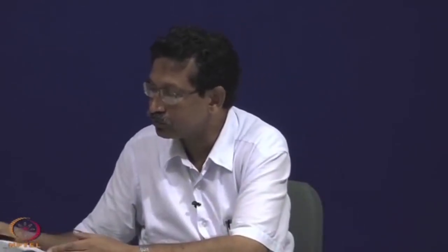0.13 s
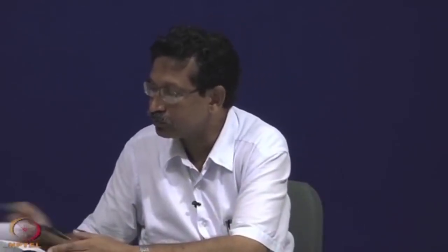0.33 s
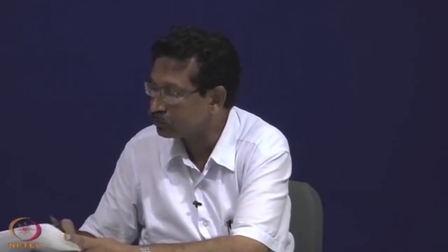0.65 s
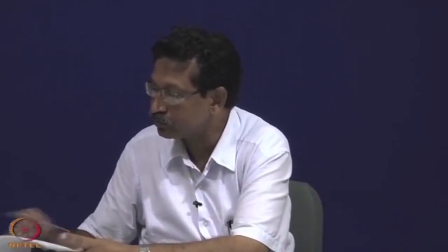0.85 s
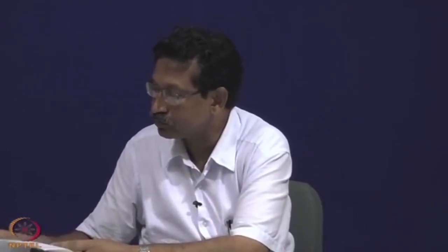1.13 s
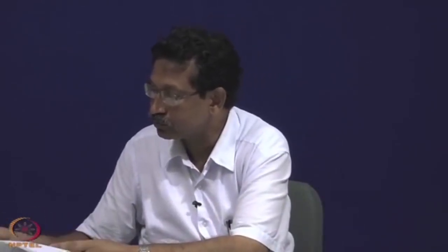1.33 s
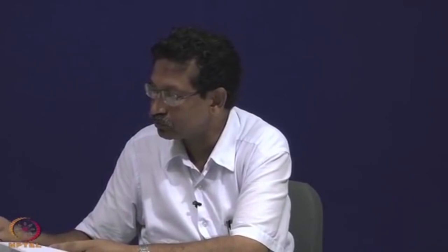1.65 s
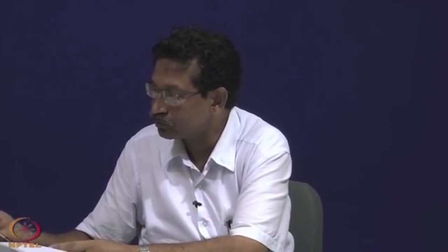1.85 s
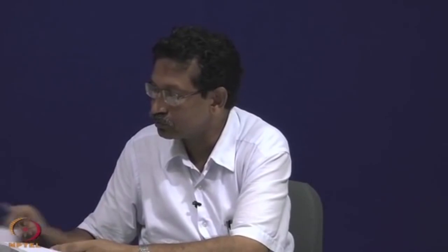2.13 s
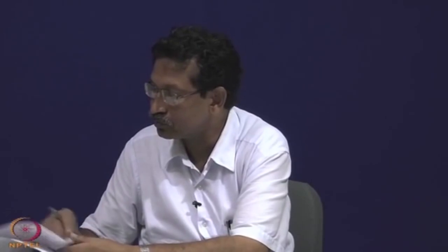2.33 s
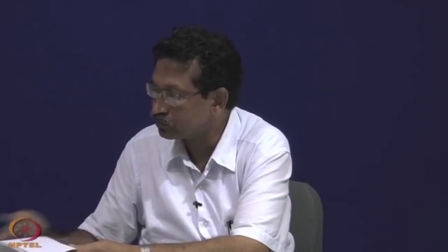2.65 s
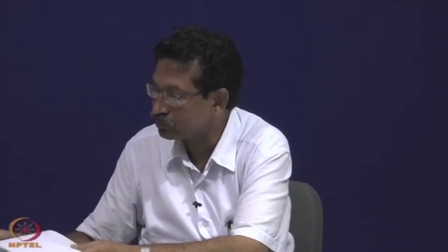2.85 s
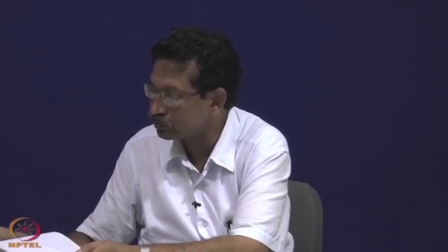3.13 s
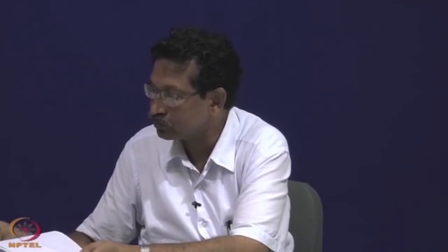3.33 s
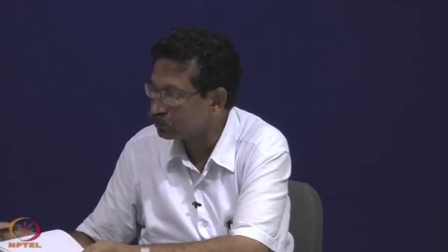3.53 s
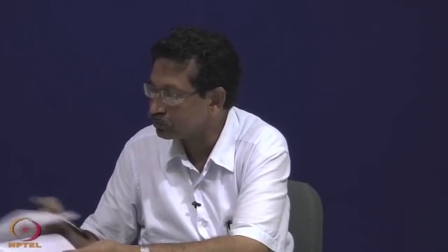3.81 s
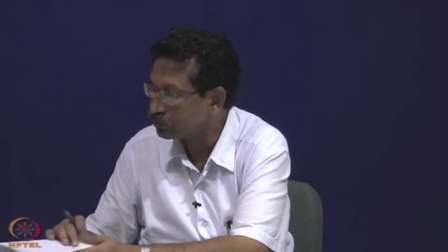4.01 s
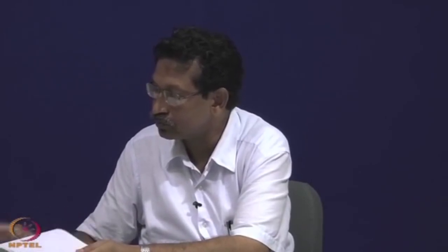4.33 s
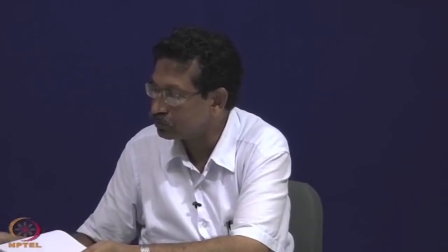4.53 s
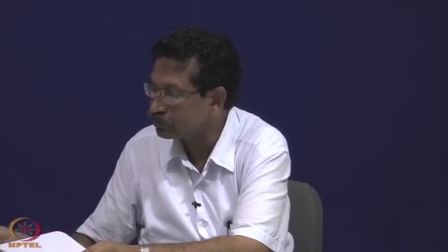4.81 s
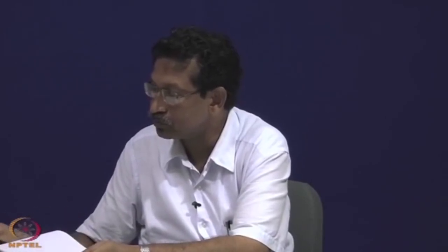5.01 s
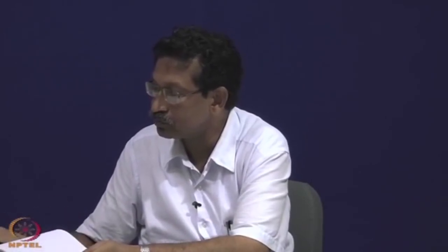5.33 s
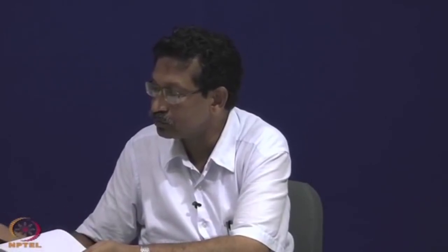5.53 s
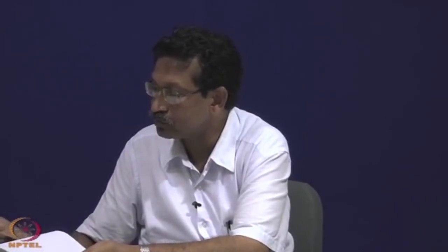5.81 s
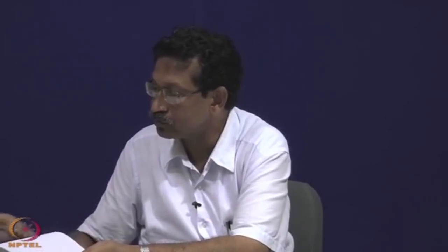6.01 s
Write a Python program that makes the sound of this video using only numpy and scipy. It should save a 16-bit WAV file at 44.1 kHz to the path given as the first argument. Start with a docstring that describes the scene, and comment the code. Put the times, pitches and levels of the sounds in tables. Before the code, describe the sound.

A low ventilation rumble with a faint hum and hiss fills a quiet room throughout. Close to a clip-on microphone, paper shifts in small, soft strokes. At about 0.6 seconds a sheet slaps down with a sharp crack, the loudest moment, followed by crinkles and a light knock at 1 second. A quick cluster of dull knocks on the desk and a pad comes at 2 seconds. From 2.2 to 3 seconds sheets slide and crackle in short strokes, with small taps and a pen click near 2.6. Faint arm rubs and slides lead to a crisp paper snap and light knocks at 4 seconds. The handling then thins to very soft sliding from 5 seconds. A pen taps the desk near 5.9 seconds and the pad is bumped just after 6. The knocks and snaps carry a slight, short room echo.

```python
"""Paper on a desk

Sheets are slid, lifted and laid down in a quiet room, heard by a clip-on microphone. They hiss as they
rub, snap as they buckle (suddenly bend), and one slaps down. A hand with a pen taps the desk, a pad is
bumped and an arm shifts. Ventilation rumbles and hums behind it all."""
import sys
import numpy as np
from scipy import signal
from scipy.fft import rfft, irfft, next_fast_len
from scipy.io import wavfile
from scipy.ndimage import uniform_filter1d

SR = 44100
rng = np.random.default_rng(int(sys.argv[2]) if len(sys.argv) > 2 else 0)


def unload_wav(signal):
    """Save mono or channel-first audio to the path in sys.argv[1] as 16-bit WAV at rate SR, clipped to [-1, 1]."""
    wavfile.write(
        sys.argv[1],
        SR,
        np.round(np.clip(np.atleast_2d(signal).T, -1, 1) * 32767).astype(np.int16),
    )


N = 272097

TREBLE_LIMIT_HZ = 15950
# how long the room echoes at each pitch: f/Hz, time to fade by 60 dB/s
ECHO_TIMES = [(150, 0.58), (1000, 0.49), (4000, 0.46), (14000, 0.37)]
# how loud the air duct rumbles over time: t/s, level/dB
RUMBLE_LEVELS = [(0.0, -42.5), (0.27, -52), (0.45, -43), (0.74, -58.5), (0.98, -49.5), (1.63, -47.5),
                 (1.7, -60), (1.97, -43.5), (2.34, -57), (3.16, -42.5), (3.25, -53), (3.81, -45.5),
                 (4.04, -58), (4.31, -42.5), (5.46, -54), (6.17, -48)]
# tones of the fan: f/Hz, level/dB, pitch wander/Hz
FAN_TONES = [(347.3, -74, 1.2), (465, -85, 3), (587, -87, 3.02), (793, -85.5, 3.18)]

# A spectrum says how strong a sound is at each pitch: f/Hz, relative level/dB
RUMBLE_SPECTRUM = [(12, -19), (20, 0), (28, 2), (39, -0.5), (48, -20), (70, -33.5), (85, -30.5), (115, -40),
                   (170, -88)]  # the duct's deep rumble
DRONE_SPECTRUM = [(35, -36.5), (50, -12.5), (58.5, 1.5), (68, -16), (85, -17), (150, -60), (400, -80)]  # the duct's own low note
ROOM_HISS_SPECTRUM = [(60, -19.5), (100, 1.5), (140, 1.5), (220, -0.5), (330, -1.5), (480, -3.5),
                      (750, -4.5), (1100, -10.5), (1700, -13.5), (2600, -21), (4000, -28), (8000, -31.5),
                      (11500, -32), (13500, -47)]  # steady background hiss of the room, with the very top cut away
HISS_SPECTRUM = [(2500, -17), (3500, -4.5), (4600, -2), (6200, 0), (7200, -2), (10500, -4), (12000, -9.5),
                 (15500, -8)]  # the high part of sliding paper
RUSTLE_SPECTRUM = [(150, -10.5), (400, 0), (950, -7.5), (1500, -2.5), (2400, -4.5), (3200, -14),
                   (5000, -44), (12000, -57)]  # its lower part
CRACK_SPECTRUM = [(300, -43), (1000, -17), (1800, -5.5), (2650, 1.5), (3300, -7.5), (4900, 1.5),
                  (5900, -0.5), (7200, -16.5), (9000, -9.5), (11200, -9), (13000, -7), (15000, -10.5)]  # a sheet slapping down
FLUTTER_SPECTRUM = [(120, -14), (280, -3), (800, 0.5), (1300, 4.5), (1800, -2), (2600, -4.5), (3500, -18.5),
                    (5400, -12), (7200, -15.5), (9000, -13.5), (10500, -14), (15500, -22)]  # a sheet fluttering afterwards

# Modes are the tones a thing rings with when struck: f/Hz, relative level/dB, ring time/s
DESK_MODES = [(277, -18.5, 0.022), (453, -12.5, 0.024), (639, -3.5, 0.014), (850, 4.5, 0.005),
              (1253, 7, 0.0042), (1650, 3.5, 0.0038), (2450, -9, 0.0097), (4100, -54, 0.0022),
              (8000, -23, .001)]  # the desk top under the paper
PEN_MODES = [(2170, -1, 0.0066), (3000, -2.5, 0.0068), (4780, 2.5, 0.0047), (6030, -6.5, 0.0079),
             (8040, -3.5, .005), (9370, 3, 0.0036), (10470, -6, .004)]  # the pen barrel
PAD_MODES = [(750, -3.5, 0.0047), (1226, 1.5, 0.0051), (2140, -4, 0.0078), (2360, -10, 0.0093),
             (4280, -18, 0.0046)]  # the pad of sheets
BUCKLE_MODES = [(1325, -2, 0.013), (2083, -0.5, 0.0093), (2400, -8, 0.004), (4300, 1.5, 0.0036),
                (5980, -2, 0.0046), (8400, 2, 0.0025), (11900, -32, 0.0019)]  # a buckling sheet
CREASE_MODES = [(1320, -5, 0.0075), (1610, -3, 0.006), (2050, 0.5, 0.0086), (2390, -6, 0.0057)]  # a gripped sheet
SHUDDER_MODES = [(500, -7, 0.043), (1080, -11, 0.033), (1310, -3, 0.033), (1410, -14, 0.06),
                 (1797, 0.5, 0.028), (2124, -4, 0.021), (2510, -1.5, 0.026), (3000, -9, 0.029),
                 (4520, -11, 0.025), (5200, -9, 0.018), (5560, -3, .014)]  # a whole sheet shaking on the desk

# an arm shifts on the desk: t/s, length/s, level/dB, middle f/Hz
ARM_SHIFTS = [(0.831, 0.093, -70, 332), (1.269, 0.11, -70, 296), (2.575, 0.048, -69, 513),
              (3.212, 0.16, -61.5, 182), (3.3, 0.22, -71, 171), (3.94, 0.11, -70, 230),
              (5, 0.084, -66, 290), (5.064, 0.05, -73, 493), (5.539, 0.58, -82.5, 3100),
              (6.005, 0.046, -67, 268)]
# Harder blows have a higher corner and sound brighter; stiffness multiplies the pitch of the modes.
# Knocks: t/s, peak level/dB, corner f/Hz, stiffness
DESK_TAPS = [(0.56, -36.5, 326, 0.76), (1.035, -44.5, 1990, 1.07), (1.9839, -38, 1600, 0.87),
             (1.9962, -35, 1900, 1.05), (1.9982, -44, 1600, 0.91), (2.1297, -44, 600, 1.16),
             (2.161, -49.5, 550, 1), (2.549, -46.5, 1500, 1.13), (2.58, -48, 1100, .9),
             (2.5525, -45.5, 700, 0.98), (2.5938, -47, 700, 0.89), (4.003, -44, 450, 0.9),
             (4.124, -44.5, 1100, 1.14), (5.8869, -39, 1000, .94)]  # hand and pen meet the desk
PEN_CLICKS = [(2.5773, -40, 16000, 1.01), (3.3897, -51, 7000, 0.9), (5.8882, -46, 2440, 0.84),
              (5.999, -56, 9000, 1.3)]  # the pen clicks down on the paper
PAD_BUMPS = [(1.0351, -50.5, 4000, 0.89), (3.961, -45, 1800, 1.16), (2.0043, -38.5, 1500, 1.02),
             (6.148, -32, 4940, 0.983)]  # the pad is bumped
# a sheet is gripped: t/s, length/s, level/dB, fade over the length/dB, stiffness
GRIPS = [(2.264, 0.041, -61.5, 7, 1.03), (2.316, 0.018, -64, 2, 1.05), (2.739, 0.17, -72.5, 0, 0.94),
         (4.119, 0.02, -59.5, 4, 0.94)]
# a sheet buckles: t/s, peak level/dB, corner f/Hz, stiffness, flutter compared with the ring/dB
BUCKLES = [(0.0358, -55.5, 4500, 0.99, 2.5), (0.108, -57.5, 2000, 0.67, 5), (0.177, -56, 2200, 0.78, 6),
           (0.2502, -50.5, 3250, 1.33, -1.5), (0.392, -56, 1500, 0.39, -20),
           (0.4417, -52.5, 3200, 0.91, 7.5), (0.508, -56, 2600, 1.3, 8), (0.5498, -46, 900, 1.1, -4),
           (0.569, -48, 7000, 1.25, -2), (0.5833, -48, 14000, 1.3, 3), (0.59, -45.5, 3000, 1, -10),
           (.596, -49, 14000, 1.5, -12.5), (0.602, -49, 14000, 1.2, -9), (0.611, -47, 15000, 1.36, -2),
           (.661, -56, 2500, 1.1, 7), (.809, -53, 3500, 1.05, 7), (0.8183, -49.5, 9000, 1.2, 7),
           (0.8667, -53.5, 3020, 0.94, 12), (0.927, -59, 12100, 2.2, 15), (1.0895, -53, 1480, 1.1, -9),
           (1.157, -61, 1800, 1, -5), (1.468, -52.5, 10000, 1.1, 3), (1.657, -59, 9100, 0.97, 6.5),
           (1.768, -53.5, 7000, 1.05, 9), (1.8829, -55.5, 2400, 0.95, -1), (1.908, -55.5, 1200, 0.9, 1),
           (1.985, -58, 14000, 2, 12), (1.9968, -49, 5000, 1, -16), (2.121, -52, 8060, 0.96, 12),
           (2.2655, -54, 3000, 1.1, 5), (2.283, -55, 14000, 1.1, 6), (2.5232, -50, 3600, 0.97, -5),
           (2.692, -50.5, 12000, 0.98, 21), (2.959, -59, 1500, 0.96, -2), (3.046, -67, 1200, 0.96, -11),
           (3.481, -56, 10000, 0.72, 3), (4.0026, -31.5, 3500, 0.98, -15), (4.128, -48, 1300, 1, -16),
           (4.229, -60, 12000, 1, 5)]
# a sheet slaps down: t/s, peak level of the crack/dB
SHEET_SLAPS = [(0.555, -19)]
# a sheet is pushed or pulled along: t/s, rise/s, hold/s, fade/(dB per s), relative hiss level/dB,
# relative rustle level/dB, boost of the sheen (the very top of the hiss)/dB
SLIDE_STROKES = [(0.098, 0.035, 0.022, 130, -73, -72.5, 5), (0.23, 0.03, 0.029, 144, -74.5, -72, 1),
                 (0.422, 0.043, 0.018, 119, -69, -66.5, -2), (0.486, 0.024, 0.0073, 200, -66, -66.5, 6),
                 (0.551, 0.0137, 0.02, 75, -64.5, -62, 3.5), (0.662, 0.067, 0.036, 105, -71, -71.5, -3),
                 (0.78, 0.031, .005, 257, -69, -71, -1), (0.83, 0.045, 0.26, 43, -83, -77, 4.5),
                 (1.459, 0.011, .01, 66, -75, -73, 1), (1.573, 0.1, .01, 85, -77, -74.5, 2),
                 (1.865, 0.021, 0.0108, 169, -77, -70.5, -9), (2.068, 0.1, 0.03, 110, -78.5, -70, -1),
                 (2.261, 0.013, 0.021, 120, -64.5, -65, 5), (2.39, 0.06, 0.023, 100, -76, -71, 6),
                 (2.501, 0.03, 0.035, 200, -70, -71, 7), (2.606, 0.047, 0.041, 198, -72, -70.5, 7),
                 (2.72, 0.045, 0.022, 120, -68.5, -68.5, 7), (2.783, 0.041, 0.03, 150, -68, -68.5, -5),
                 (2.92, 0.044, 0.014, 23.5, -73.5, -72, 1), (3.39, 0.038, 0.06, 120, -72, -72.5, 2),
                 (3.508, 0.03, 0.11, 153, -75, -74, 5), (3.806, 0.0065, 0.0082, 206, -72, -73, 7.5),
                 (3.864, 0.02, 0.04, 100, -80, -74, 0), (3.917, 0.081, 0.051, 119, -67.5, -67, 1.5),
                 (4.19, 0.03, 0.02, 280, -69, -76, 7.5), (4.25, 0.06, 0.046, 51, -77, -79.5, 2.5),
                 (4.966, 0.28, 0.23, 30.5, -83, -78.5, -6), (5.525, 0.11, 0.13, 55, -81.5, -74, 3),
                 (5.844, 0.13, 0.028, 120, -75.5, -70.5, 1.5)]


def gain_of(db):
    """Turns decibels into a number to multiply by."""
    return 10 ** (np.asarray(db) / 20)


def evened(x):
    """Scales a signal to an average strength (rms) of 1."""
    return x / np.sqrt(np.mean(x ** 2) + 1e-20)


def look_up(points, hz):
    """Reads between a table's rows along a pitch (log frequency) scale."""
    f, value = np.transpose(points)
    return np.interp(np.log(hz + 1), np.log(f + 1), value)


def add(mix, s, sound):
    """Mixes a sound in at s seconds."""
    part = mix[max(round(s * SR), 0):][:len(sound)]
    part += sound[:len(part)]


def coloured(x, spectrum):
    """Shapes a noise with a spectrum, at an average strength of 1."""
    size = next_fast_len(len(x))
    gains = gain_of(look_up(spectrum, np.fft.rfftfreq(size, 1 / SR)))
    return evened(irfft(rfft(x, size) * gains, size)[:len(x)])


def drift(rate, size=N):
    """A random curve that heads for a new value rate times a second."""
    turns = rng.standard_normal(size // 20)
    return evened(np.interp(np.arange(size) * rate / SR, np.arange(len(turns)), turns))


def background(drone_db=-60.5, room_hiss_db=-69.5):
    """A duct rumbles and drones and a fan's tones waver, over the room's steady hiss."""
    rumble_db = np.interp(np.arange(N) / SR, *np.transpose(RUMBLE_LEVELS))
    rumble = gain_of(rumble_db) * coloured(rng.standard_normal(N), RUMBLE_SPECTRUM)
    drone = gain_of(drone_db) * coloured(rng.standard_normal(N), DRONE_SPECTRUM)
    room_hiss = gain_of(room_hiss_db) * coloured(rng.standard_normal(N), ROOM_HISS_SPECTRUM)
    hum = np.zeros(N)
    for hz, db, wander_hz in FAN_TONES:
        phase = 2 * np.pi * np.cumsum(hz + wander_hz * drift(rate=12)) / SR
        hum += gain_of(db) * evened(np.sin(phase) * gain_of(drift(rate=5.4)))
    return rumble + drone + room_hiss + hum


def room_echo(x):
    """The walls return a blur of echoes whose high pitches die first."""
    hz, t, bands = signal.stft(rng.standard_normal(SR // 2), SR, nperseg=256)
    fade = gain_of(-60 * t / look_up(ECHO_TIMES, hz)[:, None])
    tail = signal.istft(bands * fade, SR, nperseg=256)[1]
    tail *= 1 - np.exp(-(np.arange(len(tail)) / SR / 0.007) ** 2)  # the walls answer a little later
    return signal.fftconvolve(x, tail / np.linalg.norm(tail))[:N]


def arm_rubs():
    """Soft rubs on the desk: low from the forearm, higher from its sleeve."""
    out = np.zeros(N)
    for s, length, db, hz in ARM_SHIFTS:
        band = signal.butter(3, [hz * 0.58, hz * 1.54], "bandpass", fs=SR, output="sos")
        rub = signal.sosfilt(band, rng.standard_normal(SR)[:round(length * SR)])
        add(out, s, gain_of(db) * evened(rub * signal.windows.tukey(len(rub), 0.7)))
    return out


def ring(modes, corner_hz, stiffness=1, flip=1):
    """A blow starts tones that swell and die; those above the corner come out weaker."""
    t = np.arange(SR // 10) / SR
    sound = np.zeros(len(t))
    for k, (hz, db, ring_s) in enumerate(modes):
        age = t * np.log(10000) / ring_s
        # a negative flip makes neighbouring modes swing against each other
        strength = flip ** k * gain_of(db) / (1 + (hz / corner_hz) ** 2)
        sound += strength * age * np.exp(-age) * np.sin(2 * np.pi * hz * stiffness * t)
    return sound


def rattled(sound, db, fade_s):
    """Follows a sound with a short, dying swarm of copies of itself."""
    t = np.arange(SR // 10) / SR
    swarm = rng.standard_normal(len(t)) * gain_of(-60 * t / fade_s) * (1 - np.exp(-t / 0.0025))
    copies = signal.fftconvolve(sound, swarm)[:len(sound)]
    return evened(sound) + gain_of(db) * evened(copies)


def smeared(x, travel_s):
    """High pitches outrun low ones as a bend travels; travel_s is the trip time at 2 kHz."""
    hz = np.fft.rfftfreq(len(x), 1 / SR)
    delay_s = travel_s * np.sqrt(2200 / (hz + 200))
    return irfft(rfft(x) * np.exp(-2j * np.pi * np.cumsum(delay_s) * hz[1]), len(x))


def desk_taps():
    """Dull knocks on the desk, cushioned by paper; each spot rings at its own pitch."""
    out = np.zeros(N)
    for s, db, corner_hz, stiffness in DESK_TAPS:
        tap = rattled(ring(DESK_MODES, corner_hz, stiffness), db=-6, fade_s=0.057)
        add(out, s, gain_of(db) * tap / abs(tap).max())
    return out


def knocks(modes, blows, travel_s, rattle_db):
    """Short knocks ring the pen or the pad, each with a slight rattle."""
    out = np.zeros(N)
    for s, db, corner_hz, stiffness in blows:
        ringing = smeared(ring(modes, corner_hz, stiffness), travel_s)
        knock = rattled(ringing, db=rattle_db, fade_s=0.037)
        add(out, s, gain_of(db) * knock / abs(knock).max())
    return out


def crunches(per_s=900, spread_db=0.5, pitch_spread=0.15):
    """A gripped sheet's creases give way in a rush, each at a slightly different pitch."""
    out = np.zeros(N)
    for s, length, db, fade_db, stiffness in GRIPS:
        run = np.zeros(SR // 2)
        count = max(round(per_s * length), 1)
        for k, (late, size, detune) in enumerate(rng.uniform(-1, 1, (400, 3))[:count]):
            progress = (k + (1 + late) / 2) / count
            crease = ring(CREASE_MODES, corner_hz=6000, stiffness=stiffness * (1 + pitch_spread * detune))
            add(run, progress * length, gain_of(spread_db * size - fade_db * progress) * crease)
        add(out, s, gain_of(db) * evened(run) * np.sqrt(length * SR / len(run)))
    return out


def flutter(spectrum, fade_s):
    """A shaken sheet gives a dense crackle that starts at once and dies away."""
    t = np.arange(SR // 10) / SR
    crackle = rng.standard_normal(len(t)) * gain_of(2.6 * drift(rate=890, size=len(t)))
    return evened(coloured(crackle, spectrum) * gain_of(-60 * t / fade_s))


def buckle(db, corner_hz, stiffness, flutter_db):
    """A buckle rings the sheet, which flutters on for a moment, brighter after a sharp snap."""
    tilt = 5 * np.log(corner_hz / 1800)
    spectrum = [(hz, level + tilt * np.log1p(hz / 4000)) for hz, level in FLUTTER_SPECTRUM]
    ringing = smeared(ring(BUCKLE_MODES, corner_hz, stiffness, flip=-1.096), travel_s=0.000737)
    snap = evened(ringing) + gain_of(flutter_db) * flutter(spectrum, fade_s=0.05)
    return gain_of(db) * snap / abs(snap).max()


def snaps():
    """The handled sheets buckle, one clear snap at a time."""
    out = np.zeros(N)
    for s, *blow in BUCKLES:
        add(out, s, buckle(*blow))
    return out


def slap(ring_db=-17, shudder_db=-36, settle_db=-38):
    """A sheet lands with a whip-like crack, then shudders and settles."""
    out = np.zeros(N)
    hz = np.fft.rfftfreq(4096, 1 / SR)
    click = irfft(gain_of(look_up(CRACK_SPECTRUM, hz)))
    crack = rattled(smeared(click, travel_s=0.001095), db=-8, fade_s=0.011)
    ringing = ring(SHUDDER_MODES, corner_hz=16000, flip=-0.93)
    for s, db in SHEET_SLAPS:
        add(out, s, gain_of(db) * crack / abs(crack).max())
        add(out, s, gain_of(db + ring_db) * ringing / abs(ringing).max())
        shudder = gain_of(shudder_db) * flutter(FLUTTER_SPECTRUM, fade_s=0.046)
        settle = gain_of(settle_db) * flutter(FLUTTER_SPECTRUM, fade_s=0.21)
        add(out, s + 0.00139, gain_of(db) * (shudder + settle))
    return out


def crinkles(per_s=42, spread_db=2, kinds=5):
    """Small creases give way at random; each kind rings the sheet at its own pitch."""
    out = np.zeros(N)
    for stiffness in np.linspace(0.75, 1.35, kinds):
        moments = rng.random(N) < per_s / kinds / SR
        sizes = gain_of(spread_db * rng.uniform(-1, 1, N))
        snap = buckle(db=0, corner_hz=5440, stiffness=stiffness, flutter_db=-6)
        out += signal.oaconvolve(moments * sizes, snap)[:N]
    return out


def friction(per_s, spread_db, smooth):
    """Tiny slips of uneven size, over the smooth hiss of countless smaller ones."""
    sizes = rng.standard_normal(N) * gain_of(spread_db * np.minimum(rng.exponential(1, N), 4))
    slips = sizes * (rng.random(N) < per_s / SR)
    return evened(slips) + smooth * rng.standard_normal(N)


def flexing(x, patchy_db):
    """A bending sheet keeps changing which pitches it gives off best."""
    bands = signal.stft(x, SR, nperseg=256)[2]
    patches = uniform_filter1d(rng.standard_normal(bands.shape), size=4, axis=0)  # blur across pitch
    patches = evened(uniform_filter1d(patches, size=16, axis=1))  # and across time
    return signal.istft(bands * gain_of(patchy_db * patches), SR, nperseg=256)[1][:N]


def stroke_curves():
    """Each stroke speeds up, holds and dies away. Gives the strengths of hiss, rustle and sheen."""
    t = np.arange(0, N + 64, 64) / SR
    power = np.zeros((3, len(t)))
    for start, rise_s, hold_s, fade_db_per_s, hiss_db, rustle_db, sheen_db in SLIDE_STROKES:
        rise = np.sin(np.pi / 2 * np.clip((t - start) / rise_s, 0, 1))
        fall = gain_of(-fade_db_per_s * np.maximum(t - start - rise_s - hold_s, 0))
        power += np.outer(gain_of([hiss_db, rustle_db, hiss_db + sheen_db]), rise * fall) ** 2
    return [np.interp(np.arange(N) / SR, t, np.sqrt(p)) for p in power]


def sliding(hiss_db=-2, rustle_db=-1, crinkle_db=9, grip_db=1.43):
    """Sheet rubs on sheet; the grip catches and eases, moving hiss and rustle together."""
    hiss_curve, rustle_curve, sheen_curve = stroke_curves()
    high_rub = coloured(friction(per_s=2000, spread_db=4.5, smooth=2.5), HISS_SPECTRUM)
    low_rub = coloured(friction(per_s=450, spread_db=2, smooth=1.8), RUSTLE_SPECTRUM)
    sheen = signal.sosfiltfilt(signal.butter(4, 11500, "highpass", fs=SR, output="sos"), high_rub)
    hiss = gain_of(hiss_db) * (hiss_curve * (high_rub - sheen) + sheen_curve * sheen)
    rustle = gain_of(rustle_db) * rustle_curve * low_rub
    grip = gain_of(drift(rate=100) + grip_db * drift(rate=25))
    rubbing = flexing(hiss + rustle, patchy_db=2) * grip
    return rubbing + gain_of(crinkle_db) * hiss_curve * crinkles()


def scene(echo_db=-15):
    """Paper and desk close by, ventilation behind; the knocks, snaps, crunches and slap echo."""
    pen = knocks(PEN_MODES, PEN_CLICKS, travel_s=0.000977, rattle_db=-6.5)
    pad = knocks(PAD_MODES, PAD_BUMPS, travel_s=0.000604, rattle_db=-11.5)
    hits = snaps() + slap() + desk_taps() + pen + pad + crunches()
    return (hits + gain_of(echo_db) * room_echo(hits) + sliding() + arm_rubs() + background())[None]


def record(dry):
    """The recorder cuts off the very highest pitches."""
    lowpass = signal.firwin(511, TREBLE_LIMIT_HZ, window=("kaiser", 9), fs=SR)
    return signal.oaconvolve(dry, lowpass[None], "same")


dry = scene()
out = record(dry)
unload_wav(out)
```